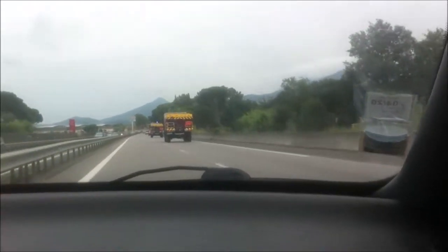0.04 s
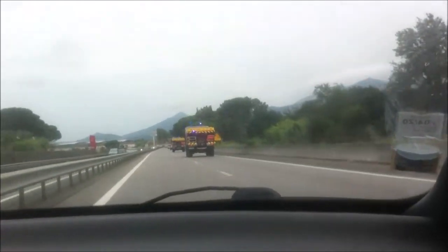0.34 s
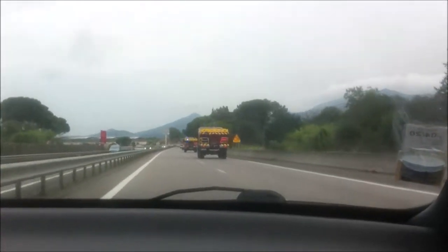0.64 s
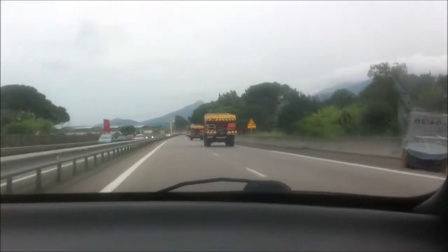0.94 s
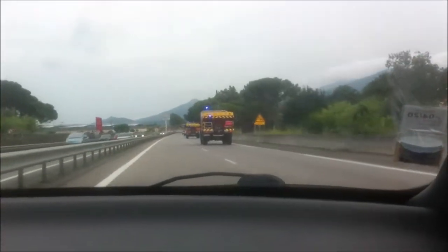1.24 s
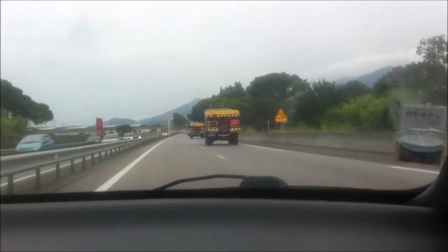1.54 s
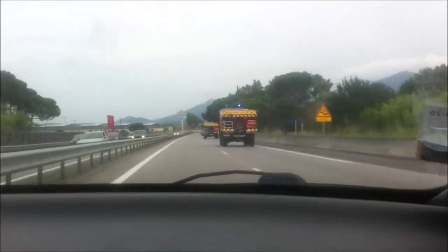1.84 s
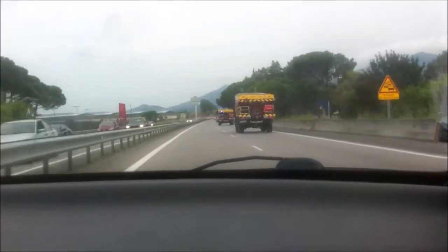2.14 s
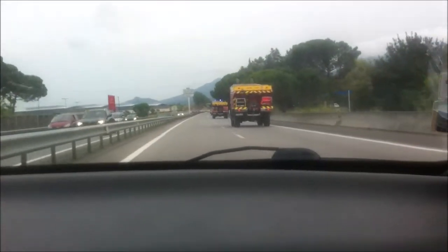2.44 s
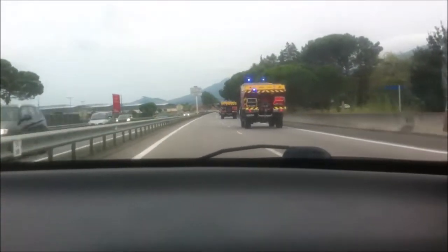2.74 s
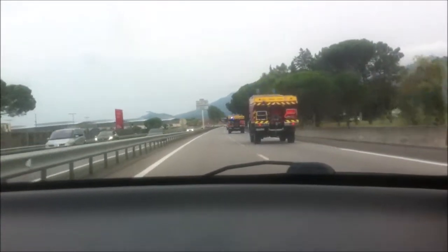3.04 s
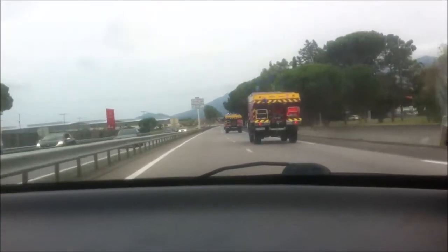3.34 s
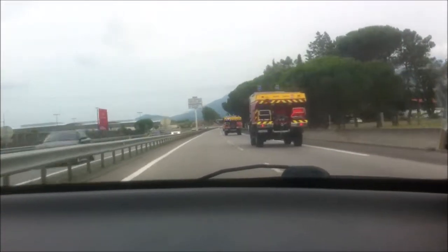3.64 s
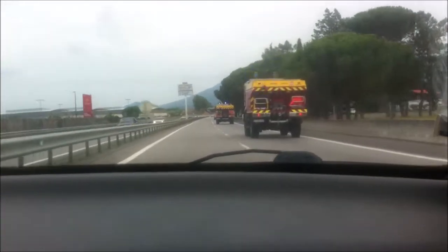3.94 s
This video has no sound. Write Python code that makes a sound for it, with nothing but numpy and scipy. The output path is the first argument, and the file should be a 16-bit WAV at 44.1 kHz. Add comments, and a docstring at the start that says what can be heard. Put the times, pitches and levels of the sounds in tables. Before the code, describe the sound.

A car rumbles steadily along a highway, heard from inside near the dashboard. The engine hums under the road noise with a faint whine and wind, as small plastic clicks and occasional dull bumps come and go.

```python
"""A low tyre rumble comes first, all round a stereo microphone inside a car at steady highway speed.
The road shakes the body, the engine drones on wavering tones, a gear whines faintly and wind hisses
on the glass. Close by, near the dashboard, plastic trim clicks and ticks as it slips and rustles as it
rubs. From below, the wheels thump over joints in the road, each leaving a short shudder in the body."""
import sys
import numpy as np
from scipy import signal
from scipy.fft import rfft, irfft, next_fast_len
from scipy.io import wavfile
from scipy.ndimage import uniform_filter1d, map_coordinates

SR = 44100
rng = np.random.default_rng(int(sys.argv[2]) if len(sys.argv) > 2 else 0)


def transcribe(u):
    """Save the signal u as a 16-bit wav file named by the first command-line argument.

    u: samples, shape (n,) or (channels, n), limited to [-1, 1]; the rate is SR.
    q: integer samples, one column per channel.
    """
    v = np.clip(np.atleast_2d(u).T, -1, 1)
    q = np.round(v * 32767).astype(np.int16)
    wavfile.write(sys.argv[1], SR, q)


N = 176400

# Relative level of road boom, tyre roar and gear whine over time: time_s, level_db
BOOM_LEVEL = [(0, -30.5), (.1, -23.5), (.3, -27.5), (.55, -26), (.85, -26.5), (1.25, -28.5), (1.55, -25),
              (1.7, -27.5), (2.15, -25.5), (2.32, -29), (2.55, -25.5), (2.8, -27), (3.1, -27),
              (3.35, -24.5), (3.5, -27), (3.72, -24), (3.87, -26.5), (4, -24.5)]
ROAR_LEVEL = [(0, -34), (.6, -35), (1.2, -35), (1.8, -35), (2.25, -35.5), (2.5, -33.5), (2.7, -35.5),
              (3, -34.5), (4, -34)]
WHINE_LEVEL = [(0, -54), (.5, -52.5), (1, -56), (1.4, -56), (2.6, -54), (3, -59.5), (4, -57)]
# Relative spectral density of each noise: frequency_hz, level_db
BOOM_COLOUR = [(10, -40), (29, -34.5), (38, -19.5), (46, -6), (66, -5), (78, -4), (94, -2.5), (116, 1),
               (145, -4.5), (185, -16), (240, -23), (400, -73.5), (1000, -120)]
ROAR_COLOUR = [(110, -40.5), (200, -2.5), (255, -3), (290, 1.5), (350, -4.5), (450, -7.5), (560, -15),
               (640, -14.5), (710, -18.5), (930, -22), (1080, -19.5), (1320, -25), (1600, -36),
               (2600, -70.5), (6000, -120)]
WIND_COLOUR = [(20, -64), (700, -36), (1300, 0), (1550, 1), (1950, 0.5), (2400, -5), (3200, -9),
               (4400, -11.5), (6200, -21.5), (9500, -23.5), (12500, -29.5), (15500, -35)]
RUB_COLOUR = [(700, -11.5), (1500, 15.5), (3000, 17.5), (4800, 5.5), (6000, 3), (7300, 0), (8500, 1.5),
              (11000, -12), (15000, -24)]
CRACKLE_COLOUR = [(1200, -9.5), (3000, 9.5), (6000, -11.5), (10000, -7.5), (15000, -21.5)]
SHUDDER_COLOUR = [(90, -29), (150, -2), (310, 3), (450, -10.5), (700, -38), (2000, -92.5)]
# Likeness of the noise at the two sides of the microphone: frequency_hz, correlation
STEREO_LIKENESS = [(60, 0.75), (120, 0.68), (240, 0.74), (480, 0.71), (950, 0.83), (1890, 0.68),
                   (3770, 0.74), (7520, 0.51), (15000, 0.38)]
# Balance of the cabin noise: frequency_hz, left_over_right_db
CABIN_BALANCE = [(60, 2), (150, 1.7), (300, 0.4), (500, 0.5), (1000, -0.6), (2000, -0.2), (15000, -0.3)]
# Tones of the engine drone: pitch_hz, level_db, drift_hz, flutter_db
ENGINE_TONES = [(96.3, -37, 1.8, 5), (175.3, -43, 0.97, 4.5), (280.2, -47, 3.01, 4), (354, -48.5, 3.5, 1.5),
                (623.6, -62, 7, 3.5), (1042, -63.5, 5, 1), (1520, -71, 6, 3.5)]
# Light clicks of a loose part: start_s, gain_db, left_over_right_db
CLICKS = [(0.045, -48, 2), (.215, -60, -4), (.32, -50.5, 0), (.945, -48, -3), (1.002, -54.5, 0),
          (1.326, -51, 2), (1.457, -53, 0), (1.783, -53, 3), (1.829, -56, 0), (1.858, -49, 0),
          (2.165, -50, 0), (2.351, -46.5, 2), (3.008, -43, -4), (3.482, -50, 2), (3.609, -48.5, 1),
          (3.706, -47.5, 0)]
# Brief rubs of plastic on plastic: start_s, level_db, squeak_hz
RUBS = [(.256, -58, 6370), (.455, -62, 5980), (0.621, -57, 2990), (0.894, -59.5, 6160), (1.297, -64, 6030),
        (1.78, -63, 5600), (2.406, -58, 5920), (2.488, -57.5, 5850), (2.551, -60, 5830),
        (2.616, -56.5, 6060), (2.678, -69, 6200), (2.716, -66, 9000), (2.746, -61.5, 8500),
        (3.156, -57, 6270), (3.233, -57.5, 2990), (3.258, -63, 3110), (3.44, -56, 5960), (3.481, -66, 9200),
        (3.65, -64, 5900), (3.946, -59, 5760)]
# Joints in the road: centre_s, thump_gain_db, shudder_gain_db
ROAD_JOINTS = [(0.42, -17, -29), (.58, -31, -34), (.77, -20.5, -37), (1.821, -21, -29.5),
               (2.322, -15.5, -38), (2.342, -16, -33), (2.472, -16, -27.5), (2.617, -19.5, -46),
               (3.35, -20.5, -43), (3.73, -21, -35), (3.976, -19.5, -49)]
# Dashboard ticks: start_s, gain_db, relative_crack_db
TICKS = [(0.559, -34.5, -5.5), (.727, -37.5, -14), (2.071, -42.5, -11), (2.108, -44, -14)]
# Resonances of the loose part and of the dashboard: pitch_hz, relative_level_db, t60_s
CLICK_MODES = [(2100, -1, 0.014), (3340, 3, .014), (4050, 1.5, .014), (4500, -1, 0.014),
               (5110, -5.5, 0.023)]
TICK_MODES = [(2280, -1, .01), (2670, 2, 0.015), (2870, 3, 0.015), (3200, -2.5, 0.013), (9360, -18, 0.015)]
# Treble loss of the soft plastic: frequency_hz, gain_db
PLASTIC_DAMPING = [(5000, 0), (9500, -2), (12500, -6), (15500, -18)]


def amp(db):
    """Decibels to gain."""
    return 10 ** (np.asarray(db) / 20)


def unit(x):
    """Scale to rms 1."""
    return x / np.sqrt(np.mean(x ** 2) + 1e-20)


def along(points, hz):
    """Read (frequency_hz, value) points on a log frequency axis."""
    frequencies, values = np.transpose(points)
    return np.interp(np.log(hz + 1), np.log(frequencies + 1), values)


def curve(rows):
    """One value per sample from (time_s, value) rows."""
    return np.interp(np.arange(N) / SR, *np.transpose(rows))


def wobble(knots_per_s):
    """A smooth random curve."""
    return map_coordinates(rng.standard_normal(400), [np.arange(N) * knots_per_s / SR + 2], mode="mirror")


def filtered(x, response):
    """Filter x by a gain given as a function of frequency."""
    size = next_fast_len(N + SR // 2)
    return irfft(rfft(x, size) * response(np.fft.rfftfreq(size, 1 / SR)), size)[..., :N]


def pan(left_over_right_db):
    """Left and right gains."""
    return amp([[left_over_right_db / 2], [-left_over_right_db / 2]])


def add(out, start_s, sound):
    """Mix a short sound in at start_s."""
    part = out[:, max(round(start_s * SR), 0):][:, :sound.shape[-1]]
    part += sound[..., :part.shape[1]]


def cabin_noise(colour):
    """Stereo noise with a mid of rms 1, as alike on both sides as the cabin makes it."""
    def response(hz):
        width = np.arccos(np.clip(along(STEREO_LIKENESS, hz), -1, 1)) / 2
        return amp(along(colour, hz)) * [np.cos(width), np.sin(width)]
    mid, side = filtered(rng.standard_normal((2, N)), response)
    return np.array([mid + side, mid - side]) / mid.std()


def tyres():
    """Tyres shake the body: a low boom that swells and sinks unevenly, and a roar above it."""
    boom = cabin_noise(BOOM_COLOUR)
    running_rms = np.sqrt(np.abs(uniform_filter1d(np.mean(boom ** 2, axis=0), size=SR // 5)))
    roar = cabin_noise(ROAR_COLOUR) * amp(0.17 * wobble(12))
    return boom / running_rms * amp(curve(BOOM_LEVEL) + 0.5) + roar * amp(curve(ROAR_LEVEL) - 0.29)


def wind(level_db=-58.5, flutter_db=0.66):
    """Air hisses along the windscreen with a slight flutter."""
    return cabin_noise(WIND_COLOUR) * amp(level_db + flutter_db * wobble(12))


def tone(pitch_hz, drift_hz, flutter_db, jitter_rad=0.45):
    """A sine of rms 1 that wavers in pitch and trembles in level."""
    phase = 2 * np.pi * np.cumsum(pitch_hz + drift_hz * wobble(9)) / SR + jitter_rad * wobble(30)
    return unit(np.sin(phase) * amp(flutter_db * wobble(12)))


def engine():
    """The engine drones on a few wavering tones."""
    return sum(amp(db) * tone(hz, drift_hz, flutter_db) for hz, db, drift_hz, flutter_db in ENGINE_TONES)


def gear_whine():
    """A gear sings one faint note that swells and sinks."""
    return amp(curve(WHINE_LEVEL)) * tone(pitch_hz=780, drift_hz=4, flutter_db=4)


def snap(modes, crack_db, crack_t60_s, rise_s=0.0005):
    """A plastic part slips: a crack of noise and a few briefly ringing modes."""
    t = np.arange(SR // 10) / SR
    ring = np.zeros((2, len(t)))
    for hz, db, t60_s in modes:
        decay = amp(db + rng.normal(0, 1) - 60 * t / t60_s)
        phase = 2 * np.pi * (hz * t + rng.random())
        ring += decay * np.sin(phase + rng.normal(0, 0.32, (2, 1)))  # each side has its own phase
    noise = 0.74 * rng.standard_normal(len(t)) + 0.7 * rng.standard_normal((2, len(t)))  # centre + wide
    crack = noise * amp(crack_db - 60 * t / crack_t60_s)
    return (ring + crack) / 2 * (1 - np.exp(-t / rise_s))


def loose_part():
    """A loose piece of trim clicks lightly, close to the microphone."""
    out = np.zeros((2, N))
    for start_s, db, side_db in CLICKS:
        add(out, start_s, amp(db) * pan(side_db) * snap(CLICK_MODES, crack_db=-0.5, crack_t60_s=0.023))
    return out


def panel_rubs(rise_s=0.0056, fall_s=0.013, relative_squeak_db=-8.5, squeak_width_hz=900):
    """Panels left of the microphone rub in short strokes, each with a hoarse squeak."""
    strokes, squeaks = np.zeros((2, 2, N))
    t = np.arange(SR // 10) / SR
    stroke = np.minimum(t / rise_s, 1) * np.exp(-np.maximum(t - rise_s, 0) / fall_s)
    for start_s, db, hz in RUBS:
        roughness = unit(uniform_filter1d(rng.standard_normal(len(t)), size=12))
        squeak = np.sin(2 * np.pi * np.cumsum(hz + squeak_width_hz * roughness) / SR)
        add(strokes, start_s, amp(db) * stroke)
        add(squeaks, start_s, amp(db + relative_squeak_db) * stroke * unit(squeak))
    return pan(5) * (strokes * cabin_noise(RUB_COLOUR) + squeaks)


def trim_crackle(specks_per_s=14, softest_db=-68, spread_db=7, t60_s=0.06):
    """The trim crackles in faint, scattered specks of noise."""
    specks = np.zeros((2, N))
    t = np.arange(SR // 10) / SR
    noise = cabin_noise(CRACKLE_COLOUR)
    for when, strength in rng.random((int(specks_per_s * N / SR), 2)):
        add(specks, when * N / SR, amp(softest_db + spread_db * strength - 60 * t / t60_s))
    return specks * noise


def road_joints(thump_hz=103.5, half_width_cycles=0.77, shudder_t60_s=0.16):
    """Each joint in the road gives the cabin one short push and pull, and the body shudders after it."""
    thumps, shudders = np.zeros((2, 2, N))
    t = np.arange(-SR // 20, SR // 5) / SR
    swell = np.exp(-(t * thump_hz / half_width_cycles) ** 2)
    thump = -np.sin(2 * np.pi * thump_hz * t) * swell
    shudder_envelope = np.where(t < 0, swell, amp(-60 * np.abs(t) / shudder_t60_s))
    for centre_s, thump_db, shudder_db in ROAD_JOINTS:
        add(thumps, centre_s + t[0], amp(thump_db) * thump)
        add(shudders, centre_s + t[0], amp(shudder_db) * shudder_envelope)
    return thumps + shudders * cabin_noise(SHUDDER_COLOUR)


def dashboard():
    """The dashboard plastic slips with a few firmer ticks, just left of centre."""
    out = np.zeros((2, N))
    for start_s, db, crack_db in TICKS:
        add(out, start_s, amp(db) * pan(1.3) * snap(TICK_MODES, crack_db, crack_t60_s=0.021))
    return out


def scene():
    """At the microphone the rumble leans a little left, with the small, close trim sounds on top."""
    cabin = tyres() + wind() + engine() + gear_whine() + road_joints()
    cabin = filtered(cabin, lambda hz: amp(along(CABIN_BALANCE, hz) * np.array([[0.5], [-0.5]])))
    snaps = filtered(dashboard() + loose_part(), lambda hz: amp(along(PLASTIC_DAMPING, hz)))
    return cabin + snaps + panel_rubs() + trim_crackle()


def record(dry):
    """The recorder cuts the treble steeply at its band limit."""
    band_limit_hz = 15750
    return signal.sosfiltfilt(signal.butter(12, band_limit_hz, fs=SR, output="sos"), dry)


dry = scene()
out = record(dry)
transcribe(out)
```